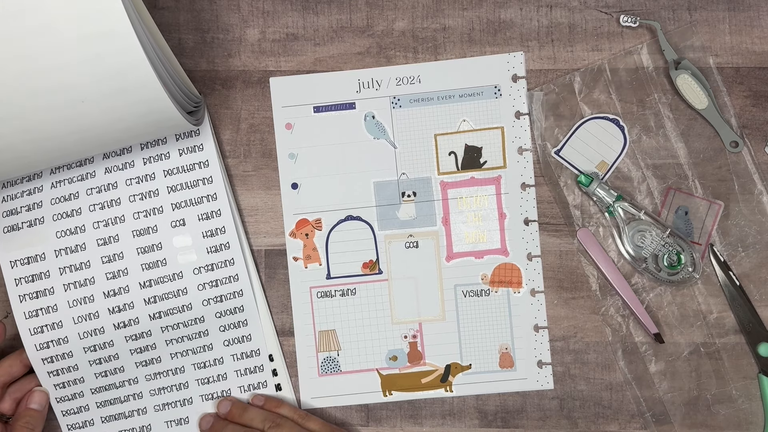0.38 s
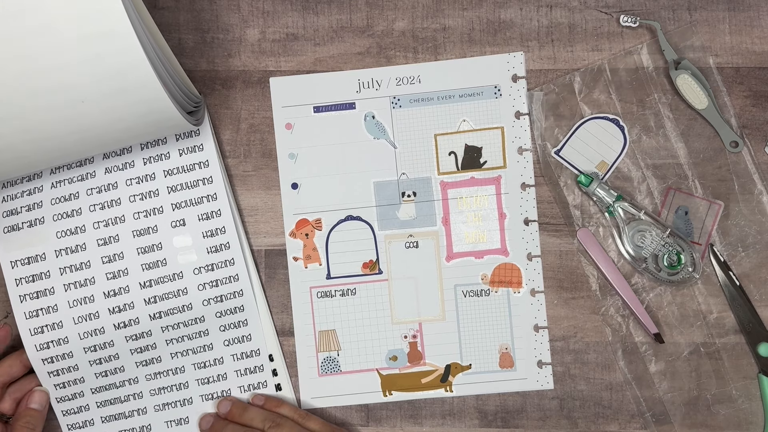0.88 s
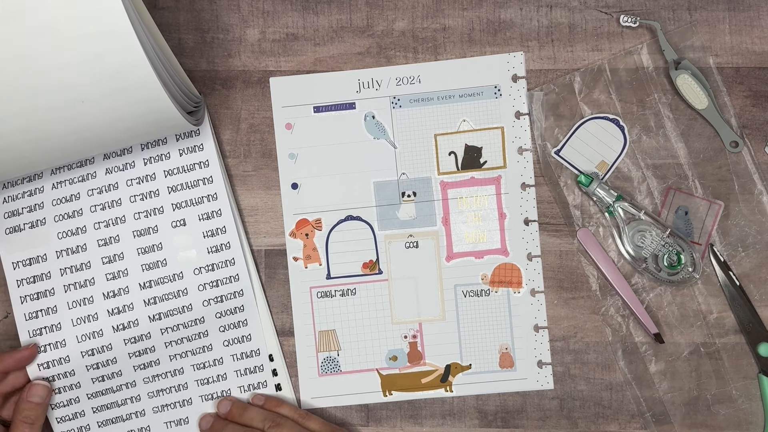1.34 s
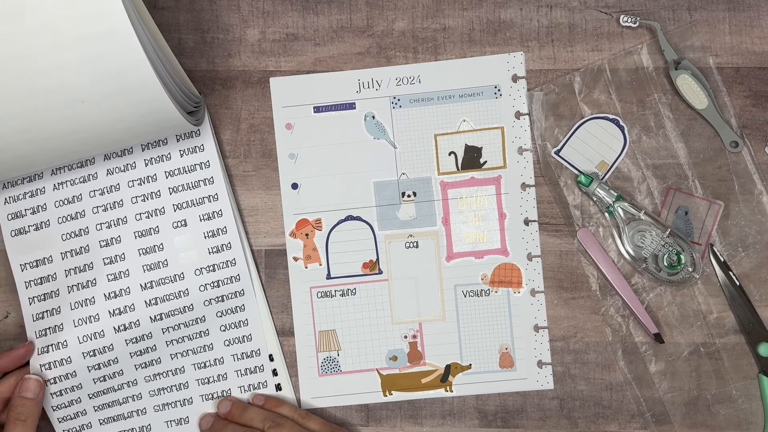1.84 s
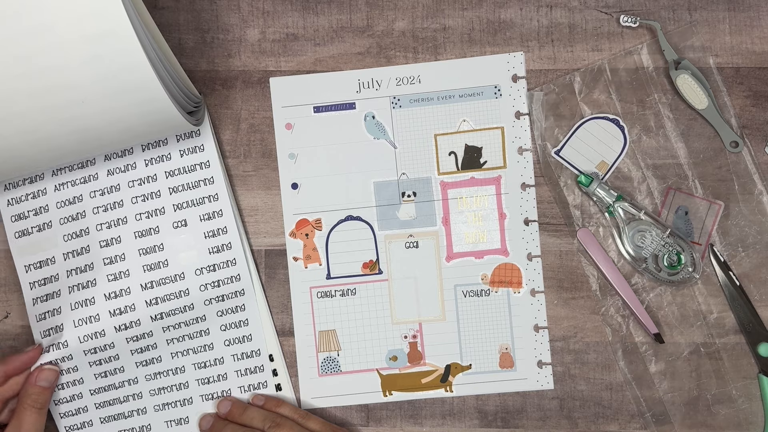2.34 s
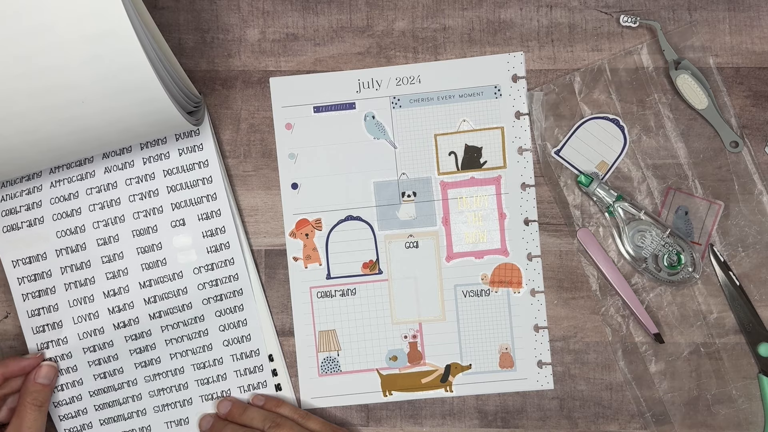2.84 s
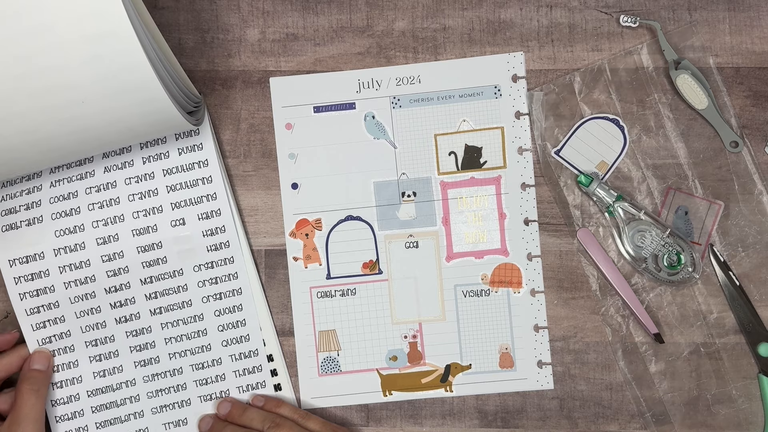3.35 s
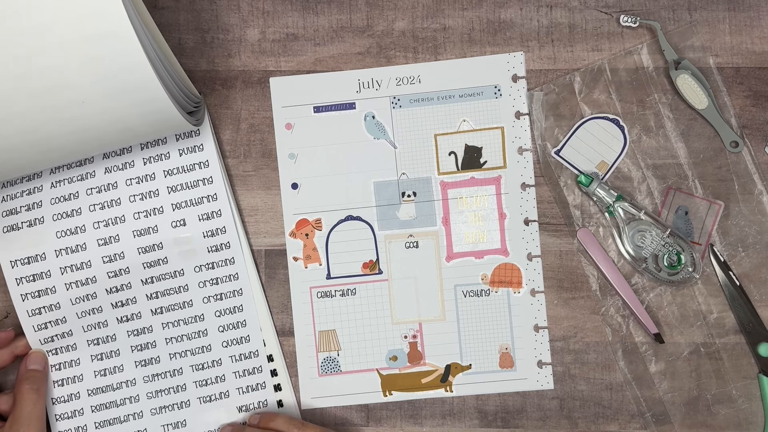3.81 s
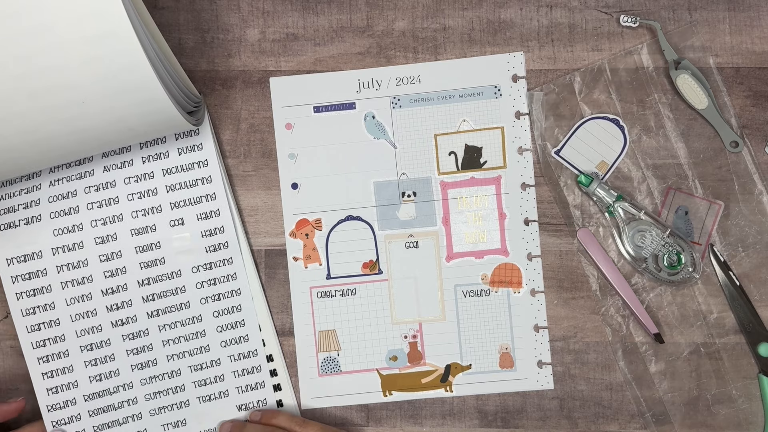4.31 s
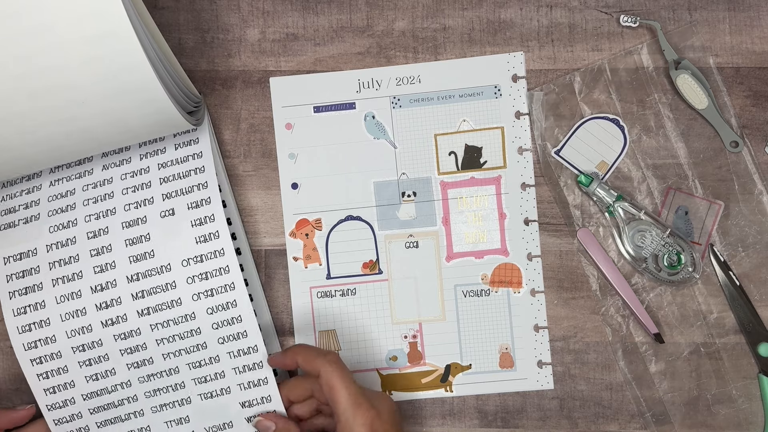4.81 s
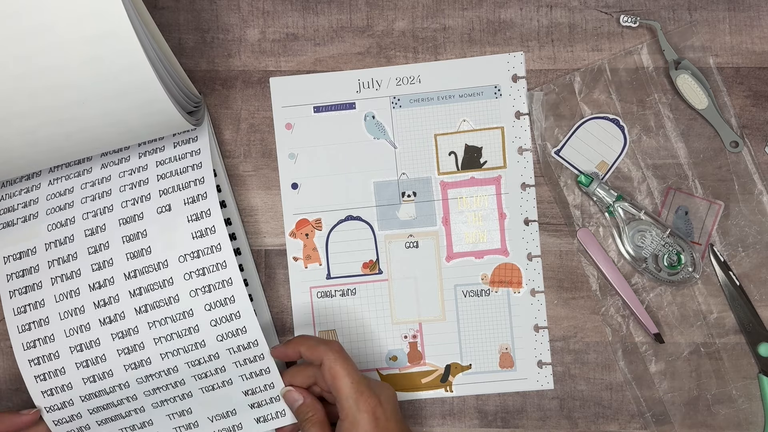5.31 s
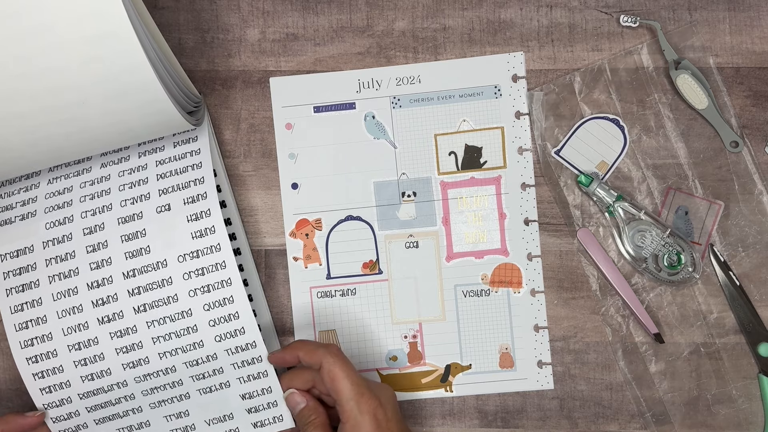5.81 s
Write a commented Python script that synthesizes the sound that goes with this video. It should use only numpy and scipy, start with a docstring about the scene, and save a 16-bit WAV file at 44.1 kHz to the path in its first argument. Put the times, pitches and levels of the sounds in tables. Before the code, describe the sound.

Fingers handle the thick pages of a sticker book on a desk, close to a stereo microphone in a quiet room. Sparse faint brushes and ticks come first, then a dense run of crisp snaps and scrapes, a papery slide, a longer dull drag with a soft knock, and a few last taps. A low hum and rumble continue throughout.

```python
"""Fingers on book pages

Fingers slide over and flick the paper pages of a book on a desk, close below a two-port microphone.
Skin on paper is shaped noise with uneven grain: drag, scrape and swish. Page snaps and a few dull
fingertip knocks on the desk are a click, a crackle and ringing modes. Sparse echoes follow. In the
quiet room an appliance hums and rumbles, made of a sine and narrow noise bands; hiss and a faint
electronic whine lie on top."""
import sys
import numpy as np
from scipy import signal
from scipy.fft import rfft, irfft
from scipy.io import wavfile
from scipy.ndimage import uniform_filter1d

SR = 44100
rng = np.random.default_rng(int(sys.argv[2]) if len(sys.argv) > 2 else 0)


def convert_level_to_amplitude(level_db):
    """Map a level in decibels to its linear amplitude factor."""
    exponent = np.asarray(level_db, float) / 20
    return 10 ** exponent


def to_wav(s):
    """Save 16-bit WAV."""
    ch = np.atleast_2d(s).T  # columns
    pcm = np.round(np.clip(ch, -1, 1) * 32767)  # PCM
    wavfile.write(sys.argv[1], SR, pcm.astype(np.int16))


N = 272097  # samples, about 6.17 s

# left-right likeness of the room sound, hiss and echoes: f/Hz, share/0-1
ROOM_LIKENESS = [(60, .99), (130, .98), (290, .85), (640, .5), (1400, .3), (3000, .5), (7000, .8),
                 (8300, .995), (15000, .995)]


def evened(x):
    """Scales to rms 1."""
    return x / np.sqrt(np.mean(x ** 2) + 1e-20)


def read(points, hz, axis=1):
    """Reads one column of a table, interpolated on a log-frequency axis."""
    table = np.transpose(points)
    return np.interp(np.log(hz + 1), np.log(table[0] + 1), table[axis])


def coloured(x, points):
    """Causal minimum-phase filter with the given spectrum, falling away beyond its ends."""
    hz = abs(np.fft.fftfreq(8192, 1 / SR))
    closed = [(20, points[0][1] - 50)] + list(points) + [(SR / 2, points[-1][1] - 60)]
    log_gain = np.log(convert_level_to_amplitude(read(closed, hz)))
    taps = np.fft.ifft(np.exp(np.conj(signal.hilbert(log_gain)))).real[:4096]
    return signal.oaconvolve(x, taps)[:len(x)]


def resonate(x, hz, width):
    """Narrow resonance: shifts hz down to zero, smooths twice, and shifts back."""
    turn = np.exp(2j * np.pi * hz * np.arange(len(x)) / SR)
    r = np.exp(-np.pi * width / SR)
    slow = signal.lfilter([1 - r], [1, -r], x / turn)
    slow = signal.lfilter([1 - r], [1, -r], slow)
    return 2 * (turn * slow).real


def tilted(x, slope_db, centre_hz=2000):
    """Tips the short-time spectrum about its centre by a slope in dB per octave that may change in time."""
    hz, t, z = signal.stft(x, SR, nperseg=128)
    slope_db = np.interp(t * SR, np.arange(len(x)), slope_db * np.ones(len(x)))
    octaves = np.log2(np.maximum(hz, 300) / centre_hz)[:, None]
    return signal.istft(z * convert_level_to_amplitude(octaves * slope_db), SR, nperseg=128)[1][:len(x)]


def pair(a, b, same):
    """Two channels from two unrelated versions of a sound, alike by a share per frequency."""
    c = np.clip(read(same, np.fft.rfftfreq(N, 1 / SR)), 0, 1)
    along = np.sqrt((1 + c) / 2) * rfft(a)
    across = np.sqrt((1 - c) / 2) * rfft(b)
    return irfft(np.array([along + across, along - across]), N)


def fingers():
    """Fibres catch the skin as dense uneven grains: a dull drag, a crisp scrape and a smoother airy swish."""
    # spectra of the three kinds of rub: f/Hz, level/dB
    drag_colour = [(500, -16), (750, -9.5), (920, 7.5), (1100, 5), (1250, 3.5), (1430, 5), (1680, -2),
                   (2000, 1.5), (2550, -3.5), (2900, -49.5), (3600, -37), (4200, -31.5), (4700, -23.5),
                   (6500, -27)]
    scrape_colour = [(1000, -21), (1500, -1), (2000, 2), (2500, 5), (2850, -0.5), (3500, -1.5), (4650, -10),
                     (5450, -12.5), (6450, -18.5), (8000, -6.5), (11000, -11.5)]
    swish_colour = [(4000, -20), (6000, -19), (8000, -9), (11000, -3), (13000, -1.5), (15000, -4),
                    (15700, -4.5)]
    # resonant bands of a rubbed page: f/Hz, level/dB
    page_bands = [(100, 1.5), (3000, -3.5), (3600, -1), (4200, -0.5), (4650, 1.5), (5050, 2.5), (5400, 0),
                  (6000, -1), (6450, 5), (7000, -7), (16000, -3)]
    # left-right likeness of the touches: f/Hz, share/0-1
    likeness = [(500, .75), (1400, .9), (3000, .97), (6000, .98), (8300, .998), (15000, .998)]
    drag_db, scrape_db, swish_db = touches()
    # scrape slope in dB per octave rises with swish over scrape and with drag over scrape
    slope_db = 5 + 0.62 * (swish_db - scrape_db) + 0.3 * (drag_db - scrape_db)
    slope_db = np.clip(slope_db, -10, 10)
    clumps = rng.exponential(1, N // 60 + 1)
    catches = convert_level_to_amplitude(1.53 * uniform_filter1d(clumps, 2).repeat(60)[:N])  # clumps of 2-3 ms
    # single fibres breaking loose under a scrape, about 120 a second
    ticks = convert_level_to_amplitude(6 + 3.5 * np.minimum(rng.exponential(1, N), 3)) * (rng.random(N) < 120 / SR)
    ticks = np.convolve(ticks, np.exp(-np.arange(88) / 22))[:N]  # decay constant about 0.5 ms
    versions = []
    for noise in rng.standard_normal((2, 3, N)):
        drag = evened(coloured(noise[0] * catches, drag_colour)) * convert_level_to_amplitude(drag_db)
        scrape = evened(coloured(noise[1] * (catches + ticks), scrape_colour)) * convert_level_to_amplitude(scrape_db)
        scrape = tilted(scrape, slope_db, centre_hz=2650)
        swish = evened(coloured(noise[2] * catches ** 0.43, swish_colour)) * convert_level_to_amplitude(swish_db)
        versions.append(coloured(drag + scrape, page_bands) + swish)
    return pair(*versions, likeness)


def touches():
    """Levels in dB of drag, scrape and swish: every touch lands fast and lifts more slowly."""
    # short strokes of a finger on paper: start t/s, length t/s, drag level/dB, scrape level/dB, swish level/dB
    strokes = [(0.281, 0.032, -83, -70.5, -93), (0.989, 0.045, -71, -69, -77),
               (1.049, 0.019, -73, -63, -74), (1.125, 0.14, -69, -63, -79),
               (1.333, 0.089, -77.5, -75.5, -85), (1.506, 0.024, -74, -79, -80),
               (1.524, 0.072, -70, -71, -72), (1.713, .095, -74.5, -87, -103),
               (1.809, 0.014, -67, -69, -75), (1.835, 0.097, -83, -87, -88), (2.05, 0.23, -82, -97, -95),
               (3.034, .12, -69.5, -63.5, -72), (3.159, 0.067, -62, -58.5, -72),
               (3.242, 0.063, -72, -74.5, -86), (3.333, 0.025, -65.5, -59.5, -66),
               (3.485, 0.094, -61.5, -59, -68.5), (3.66, 0.048, -64.5, -70, -82),
               (3.767, 0.076, -78, -84, -84), (3.958, 0.034, -59.5, -59.5, -79),
               (4.396, 0.038, -64.5, -59.5, -73.5), (4.445, .03, -73, -82, -74.5),
               (4.487, 0.024, -80, -63, -75.5), (4.525, 0.23, -99, -103, -83.5),
               (5.396, 0.014, -70, -72, -89), (5.465, 0.028, -73.5, -95, -99),
               (5.763, 0.054, -68.5, -91, -104), (6.031, 0.026, -70, -102, -90),
               (6.101, 0.14, -69, -84.5, -80.5)]
    # two long slides across the page, as paths: t/s, drag level/dB, scrape level/dB, swish level/dB
    slides = [
        [(4.015, -80, -71, -74), (4.06, -85, -71.5, -68.5), (4.12, -73, -70, -73.5), (4.25, -76, -68, -68),
         (4.385, -76, -68, -77)],
        [(4.765, -83, -87, -93), (4.792, -61, -74, -84), (4.83, -65, -82, -84.5), (4.89, -61, -75, -75),
         (4.96, -62, -70, -78), (5.05, -59, -69, -77.5), (5.2, -60.5, -72, -84), (5.303, -61, -75, -84)],
    ]
    # pressure grows and speed sags along a stroke, start to end: drag, scrape, swish change/dB
    dig_in_db = (3.5, -1, -1)
    land_db_per_s, lift_db_per_s = 2194, 895
    brush_db, brush_db_per_s = 16, 501  # a light brush leads in: dB under the touch, and how fast it grows
    t = np.arange(0, N, 32) / SR
    power = np.full((3, 1), 1e-11)
    half_change = np.divide(dig_in_db, 2)
    paths = []
    for s, length, *db in strokes:
        paths.append([(s, *np.subtract(db, half_change)), (s + length, *np.add(db, half_change))])
    for path in paths + slides:
        s, *columns = np.transpose(path)
        early = np.maximum(s[0] - t, 0)
        late = np.maximum(t - s[-1], 0)
        away_db = np.minimum(land_db_per_s * early, brush_db + brush_db_per_s * early) + lift_db_per_s * late
        level_db = np.array([np.interp(t, s, c) for c in columns]) - away_db
        power = power + convert_level_to_amplitude(level_db) ** 2
    return [np.interp(np.arange(N) / SR, t, 10 * np.log10(p)) for p in power]


def snaps_and_knocks():
    """Page snaps, and a few dull fingertip knocks on the desk: a click, a short crackle and ringing modes."""
    # page snaps and dull knocks: t/s, level/dB, brightness/dB per octave, centre of the ring f/Hz,
    # crackle decay t/ms
    hits = [(0.281, -64, -3, 2050, 5.7), (0.3061, -56.5, -3.5, 900, 3.8), (0.6682, -69, -3, 2500, 3.3),
            (1.089, -50, -2, 2500, 3.2), (1.8051, -53, -3.5, 1450, 8.9), (1.8425, -47.5, 1, 3500, 10.6),
            (1.9418, -62, -4, 1450, 2.8), (2.1777, -66.5, 13, 4650, 7.5), (2.225, -57, -15, 900, 12),
            (2.274, -69, -9, 2500, 10), (2.4104, -42.5, 1, 900, 4), (2.5388, -61, -2, 900, 9),
            (2.555, -48.5, 0, 900, 6.1), (2.5719, -40, 0, 900, 3.7), (2.683, -53, 0, 2050, 4.5),
            (2.6987, -37.5, 2, 900, 6.7), (2.7132, -45, 2.5, 2050, 7.2), (2.761, -41.5, 2.5, 1450, 7.2),
            (2.825, -44.5, 1, 1250, 6), (2.859, -46, 1, 1450, 6.7), (2.9643, -46, 0.5, 900, 5.2),
            (3.004, -58, -4, 2050, 13), (3.0406, -46.5, -7, 900, 4.5), (3.0961, -50, -1, 1450, 7.8),
            (3.1615, -59, -4, 1450, 19), (3.3276, -54.5, -1.5, 2050, 19), (3.4847, -49.5, 1.5, 2050, 11),
            (3.5138, -39, -2, 2050, 3.5), (3.6613, -56.5, -4, 900, 2.5), (3.7146, -50.5, 1.5, 3500, 10),
            (3.7325, -38.5, -1, 2790, 1.8), (3.7777, -59, -1, 1250, 6.6), (3.9579, -51, -2, 900, 5.3),
            (3.9795, -51, -0.5, 2050, 2.1), (4.0627, -56.5, 0, 900, 5.4), (4.3973, -50, -2.5, 1450, 1.6),
            (4.4125, -47.5, -3, 2500, 0.91), (4.869, -47, -17, 1250, 3), (5.2788, -46.5, -9, 1150, 1.2),
            (5.3928, -61, -2.5, 900, 6.6), (5.4287, -59.5, -4.5, 900, 6.2), (5.4706, -61.5, -8, 1250, 2.3),
            (5.7556, -59, -5.5, 900, 14), (5.8095, -49, -10, 1145, 4.4), (6.0203, -61, -11, 900, 3.5),
            (6.0846, -45.5, -6, 1610, 3)]
    # how page and desk colour a hit: f/Hz, level/dB
    paper = [(300, -7.5), (700, -5), (900, 8.5), (1100, 0.5), (1430, 3.5), (1680, 0), (2000, 1),
             (2500, -4.5), (2950, -6), (3600, -6.5), (5000, -8), (7500, -16.5), (11000, -9), (15700, -13)]
    # modes of page and desk: f/Hz, level/dB, t60/s
    desk = [(333, 1.5, 0.024), (640, 6.5, 0.05), (900, -0.5, 0.02), (1250, 2.5, 0.018), (1450, -1.5, 0.027),
            (2050, 1, 0.012), (2500, 5.5, 0.0045), (3500, 10.5, 0.0068), (4650, 4.5, 0.014)]
    # a fingertip knocks on the desk and rings its second mode: t/s, drive level/dB
    knock = (4.8685, -53.5)
    # left-right likeness of the hits: f/Hz, share/0-1
    likeness = [(500, 0.69), (1400, 1), (3000, 0.84), (6000, 0.67), (9000, 0.88), (15000, 0.54)]
    reach = 0.32  # octaves of modes that one hit excites
    out, t = np.zeros((2, N + 4410)), np.arange(4410) / SR
    modes = np.array([convert_level_to_amplitude(db - 60 * t / t60) * np.sin(2 * np.pi * hz * t) for hz, db, t60 in desk])
    modes = modes * (1 - np.exp(-t / 0.00018))  # the ring starts softly
    click = 7. * (t == 0)
    noises = rng.standard_normal((len(hits), 2, 4410))
    for (s, db, slope_db, focus_hz, ms), noise in zip(hits, noises):
        crackle = noise * 5.2 * np.exp(-(1000 * t / max(ms, .5)) ** 1.06)
        # a dull hit is a soft contact with a lower treble edge
        soft = signal.butter(2, np.clip(12000 * 2 ** (0.22 * slope_db), 800, 20000), fs=SR)
        along, across = (signal.lfilter(*soft, tilted(coloured(n, paper), slope_db))
                         for n in (crackle[0] + click, crackle[1]))
        # the place of the hit picks the modes
        near = np.exp(-(np.log2(np.transpose(desk)[0] / focus_hz) / reach) ** 2)
        # clean, short and dull hits ring most
        ring = convert_level_to_amplitude(1 - 0.86 * ms - 0.14 * slope_db) * near @ modes
        # crisp snaps slap down hardest on the lowest mode
        thump = convert_level_to_amplitude(-7 + 1.5 * slope_db) * modes[0]
        size, at = convert_level_to_amplitude(db) / abs(along).max(), round(s * SR)
        out[0, at:at + 4410] += size * along + convert_level_to_amplitude(db) * (ring + thump)
        out[1, at:at + 4410] += size * across
    knock_s, knock_db = knock
    at = round(knock_s * SR)
    out[0, at:at + 4410] += convert_level_to_amplitude(knock_db) * modes[1]
    return pair(*out[:, :N], likeness)


def echoes(x):
    """Room reflections: sparse taps of random sign, each band dying at its own speed."""
    # decay of the echoes: f/Hz, t60/s
    decay = [(300, 0.73), (2000, 0.18), (10000, 0.17)]
    taps = np.zeros((2, SR // 2))
    at = np.arange(150, SR // 2 - 20, 20)
    at = at + rng.integers(0, 20, (2, len(at)))
    np.put_along_axis(taps, at, rng.choice([-1., 1.], at.shape), 1)
    hz, t, z = signal.stft(taps, SR, nperseg=256)
    fade = convert_level_to_amplitude(-60 * t / read(decay, hz)[:, None])
    tail = signal.istft(z * fade, SR, nperseg=256)[1]
    return signal.fftconvolve(x, tail / np.linalg.norm(tail[0]), axes=1)[:, :N]


def appliance():
    """A mains hum over rumbling air that excites the low room resonances."""
    # air rumble ringing in the room: f/Hz, width of each smoothing/Hz, rms level/dB
    rumble_bands = [(40.95, 4.9, -61), (63.5, 31, -61), (86.56, 21, -53.5), (102.82, 7.14, -55),
                    (152.97, 15.3, -54.5)]
    # spectrum of the broad room tone: f/Hz, level/dB
    room_colour = [(150, -10), (185, -3.5), (220, 1.5), (260, -4.5), (360, -8), (550, -11.5), (770, -16.5),
                   (1000, -20.5), (1500, -26.5), (2600, -34), (2900, -41), (8000, -50)]
    # steady hum: f/Hz, rms level/dB
    hum_tones = [(119.8, -51)]
    t = np.arange(N) / SR
    versions = []
    for noise in rng.standard_normal((2, N + SR // 2)):  # the first half second lets the resonances settle
        rumble = sum(convert_level_to_amplitude(db) * evened(resonate(noise, hz, width)) for hz, width, db in rumble_bands)
        room_tone = convert_level_to_amplitude(-66.5) * evened(coloured(noise, room_colour))
        versions.append((rumble + room_tone)[-N:])
    hum = sum(np.sqrt(2) * convert_level_to_amplitude(db) * np.sin(2 * np.pi * (hz * t + rng.random())) for hz, db in hum_tones)
    return pair(*versions, ROOM_LIKENESS) + hum


def electronics():
    """Microphone hiss, and a high whine of two sines over a narrow band of fuzzy noise."""
    # spectrum of the hiss: f/Hz, level/dB
    hiss_colour = [(3000, -4), (7000, -4), (11000, -2), (15500, 0.5)]
    # whine tones before the fade: f/Hz, rms level/dB
    whine_tones = [(14494, -93.5), (14615, -89.5)]
    # the whine swells, then sinks late on: t/s, level/dB
    whine_fade = [(0, 0), (1.2, 1), (5.0, 3), (5.4, -14), (6.17, -18)]
    # steady fuzz around the whine: width of each smoothing/Hz, rms level/dB
    whine_fuzz = (260, -91)
    t = np.arange(N) / SR
    a, b, c = rng.standard_normal((3, N))
    hiss = pair(coloured(a, hiss_colour), coloured(b, hiss_colour), ROOM_LIKENESS)
    hiss = convert_level_to_amplitude(-90) * evened(hiss)
    whine = sum(np.sqrt(2) * convert_level_to_amplitude(db) * np.sin(2 * np.pi * (hz * t + rng.random())) for hz, db in whine_tones)
    whine = whine * convert_level_to_amplitude(np.interp(t, *np.transpose(whine_fade)))
    width, db = whine_fuzz
    fuzz = convert_level_to_amplitude(db) * evened(resonate(c, 14550, width))
    return hiss + fuzz + whine


def scene():
    """Hands on paper and desk with their echoes, over the room."""
    hands = fingers() + snaps_and_knocks()
    tail = pair(*echoes(hands), ROOM_LIKENESS)
    return hands + convert_level_to_amplitude(-11.5) * tail + appliance() + electronics()


def top_cut(x):
    """Nothing passes above the cut-off."""
    return signal.sosfilt(signal.butter(12, 16540, fs=SR, output="sos"), x)


def record(dry):
    """The two ports differ in phase and level, so the treble cancels in turn in their sum and difference."""
    # the two ports: f/Hz, left phase lead/rad, left minus right level/dB
    ports = [(60, 0, -1.2), (150, 0.05, -2), (500, .3, 1.4), (1640, .8, 0.1), (2400, 0.05, .5),
             (3270, -.5, 0.1), (4400, 0.05, -2), (7200, .2, -.2), (8300, 2.8, 0), (9400, 3.5, 0),
             (10600, 5.8, 0), (11800, 6.7, 0), (12400, 7.8, 0), (12900, 9.1, 0), (13800, 9.8, 0),
             (14300, 10.9, 0), (15600, 12.5, 0)]
    hz = np.fft.rfftfreq(N, 1 / SR)
    half = np.exp(.5j * read(ports, hz)) * convert_level_to_amplitude(read(ports, hz, axis=2) / 2)  # each port takes half
    edge = np.clip((15850 - hz) / 100, .03, 1)  # the band ends steeply
    mix = irfft(edge * rfft(dry) * np.array([half, 1 / half]), N)
    return top_cut(mix)


dry = scene()
out = record(dry)
to_wav(out)
```